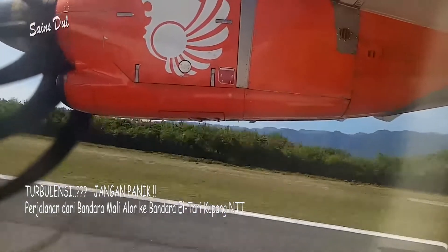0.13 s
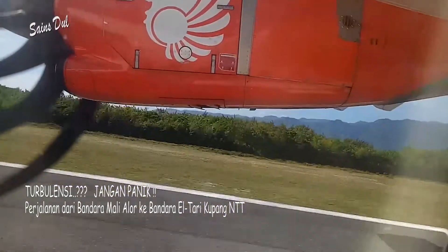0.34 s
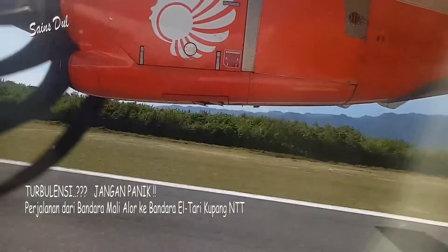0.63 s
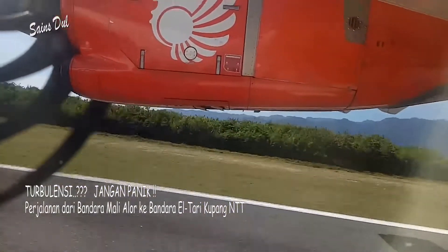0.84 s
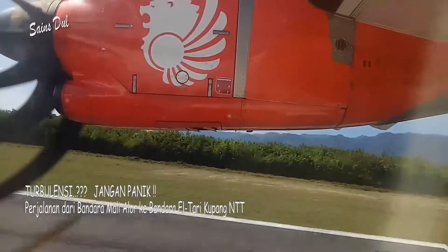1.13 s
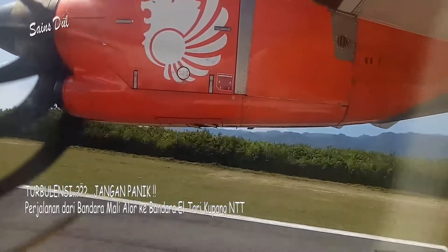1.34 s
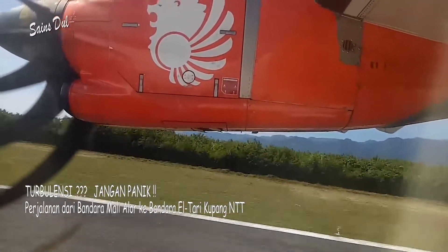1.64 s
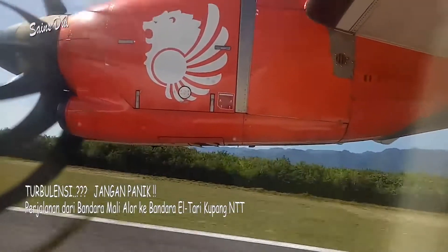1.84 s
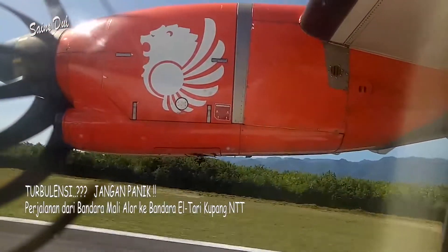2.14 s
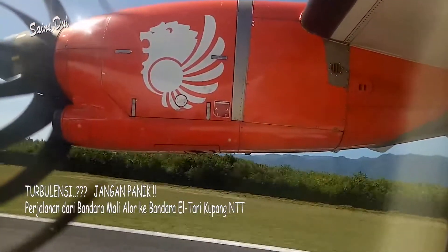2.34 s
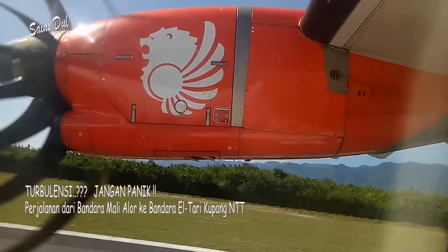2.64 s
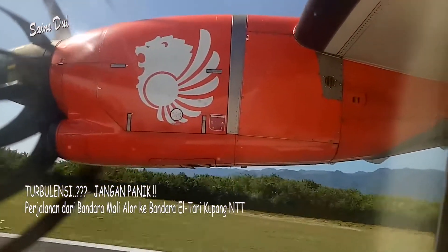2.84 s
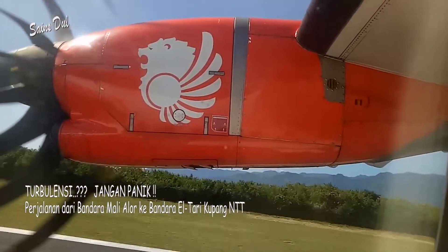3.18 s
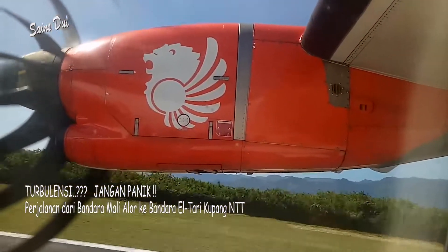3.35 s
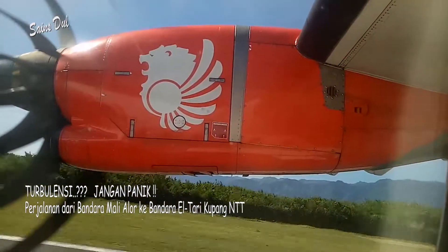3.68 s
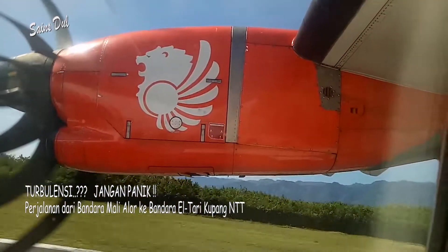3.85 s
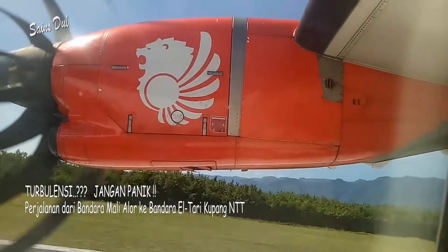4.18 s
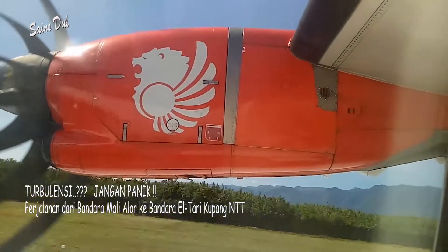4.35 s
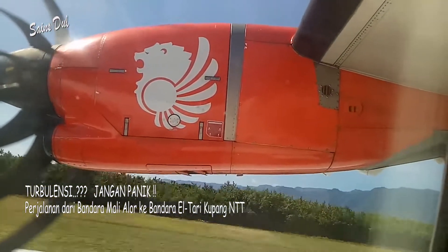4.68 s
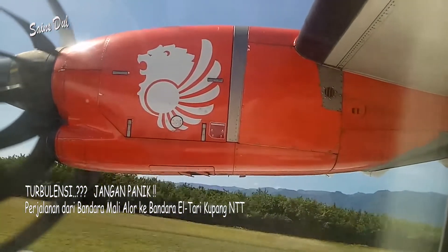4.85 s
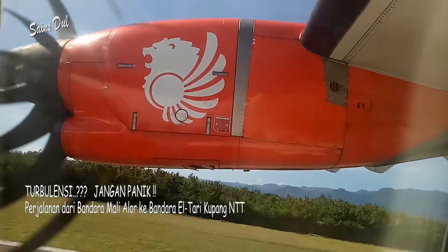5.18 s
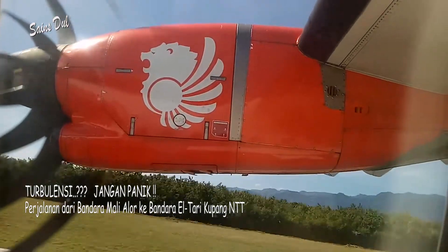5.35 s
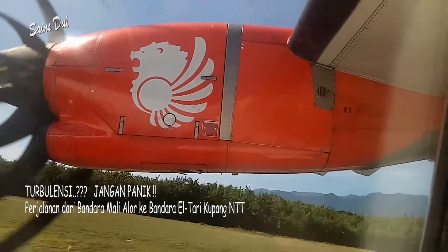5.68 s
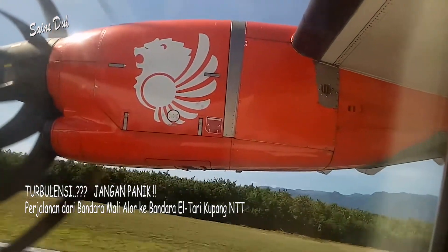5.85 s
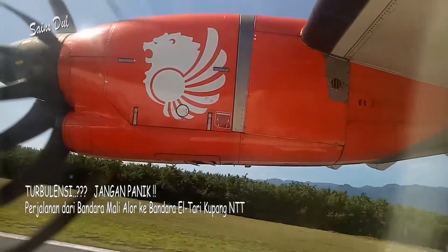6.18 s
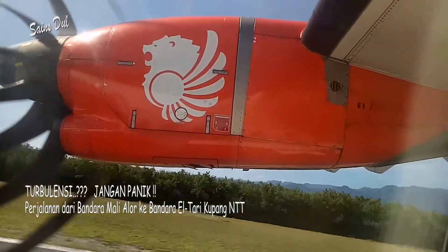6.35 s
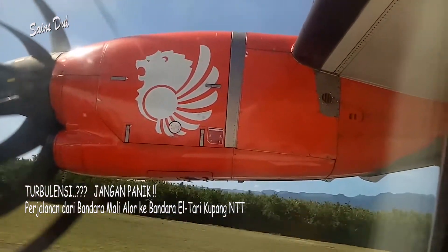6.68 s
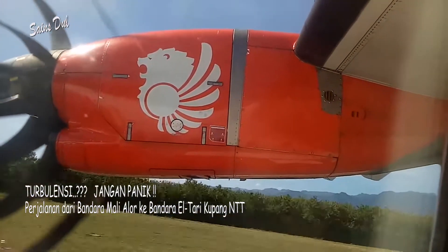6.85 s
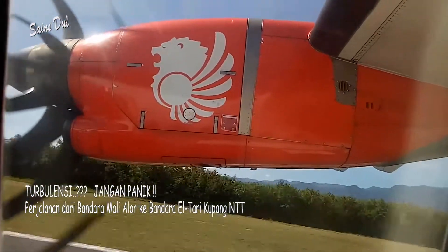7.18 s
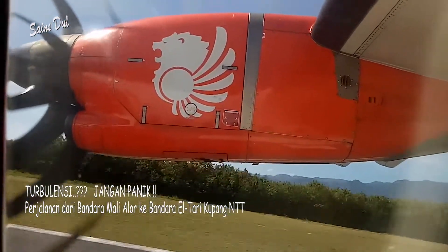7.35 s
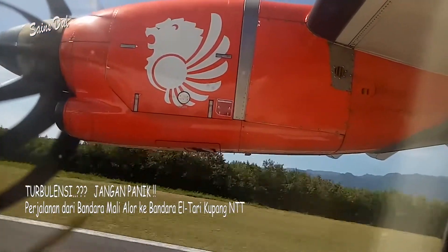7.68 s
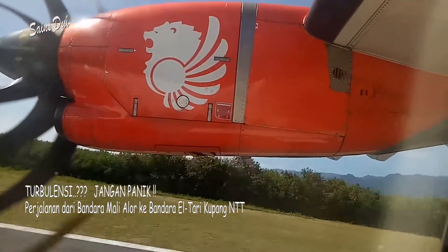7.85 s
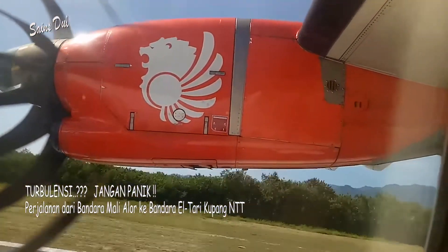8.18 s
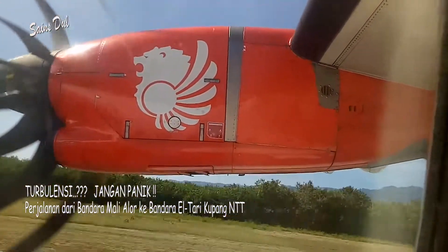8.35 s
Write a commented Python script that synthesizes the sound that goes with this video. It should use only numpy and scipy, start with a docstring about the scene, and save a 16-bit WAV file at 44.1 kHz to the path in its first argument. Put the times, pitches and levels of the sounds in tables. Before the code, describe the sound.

A loud, steady propeller drone and rumble inside an aircraft cabin on its takeoff roll, with buzzing panels and light metallic tinkling.

```python
"""A six-bladed propeller drones through the cabin wall of a turboprop on its take-off roll.
Heard from a seat, on a phone's two microphones held near the window. Each passing blade sends in
a pressure pulse, over airframe rumble and air roar. Close by, trim panels buzz in step with the
blades and chirp, a loose metal fitting tinkles and the seat frame knocks. The left microphone
is the louder one, and a limiter holds down its crests."""
import sys
import numpy as np
from scipy import signal
from scipy.fft import rfft, irfft, next_fast_len
from scipy.io import wavfile
from scipy.ndimage import uniform_filter1d, minimum_filter1d

SR = 44100
rng = np.random.default_rng(int(sys.argv[2]) if len(sys.argv) > 2 else 0)


def bounce(signal):
    """Save signal as a 16-bit WAV file at the path given by the first command-line argument."""
    frames = np.transpose(np.atleast_2d(signal))
    limited = np.clip(frames, -1, 1)
    pcm = np.round(limited * 32767).astype(np.int16)
    wavfile.write(sys.argv[1], SR, pcm)


N = 375732
T = np.arange(N) / SR


def undb(db):
    """Decibels to gain."""
    return 10 ** (np.asarray(db) / 20)


def unit(x):
    """Scale to rms 1."""
    return x / np.sqrt(np.mean(x ** 2))


def curves(table):
    """Columns of a time table, one value a sample."""
    time_s, *columns = np.transpose(table)
    return [np.interp(T, time_s, column) for column in columns]


def wander(rate_hz):
    """Smooth random drift of rms 1, with rate_hz new values a second."""
    hold = int(SR / rate_hz)
    steps = np.repeat(rng.standard_normal(N // hold + 1), hold)
    return unit(uniform_filter1d(uniform_filter1d(steps, hold), hold)[:N])


def ring(x, hz, width_hz):
    """Resonance with gain 1 at its centre."""
    return signal.lfilter(*signal.iirpeak(hz, hz / width_hz, fs=SR), x)


def decay(impulses, tau_s):
    """Give each impulse an exponential tail."""
    return signal.lfilter([1], [1, -np.exp(-1 / (tau_s * SR))], impulses)


def mic_noise(shared=.86, lead_s=.0003):
    """Noise that the right microphone partly shares with the left and hears a little earlier."""
    left, own = rng.standard_normal((2, N))
    right = shared * np.roll(left, -int(lead_s * SR)) + np.sqrt(1 - shared ** 2) * own
    return np.array([left, right])


def shaped_noise(spectrum, swell_db, flicker_db):
    """Stereo noise in half-octave bands that swell together and flicker alone."""
    size = next_fast_len(N)
    freqs = np.maximum(np.arange(size // 2 + 1) * SR / size, 1)
    hz, *columns = np.transpose(spectrum)
    left_db, right_db, shared = (np.interp(np.log(freqs), np.log(hz), c) for c in columns)
    left, own = rfft(rng.standard_normal((2, size)))
    right = shared * left + np.sqrt(1 - shared ** 2) * own
    both = np.array([left * undb(left_db), right * undb(right_db)]) * np.sqrt(SR / 2)
    half_octaves = 2 * np.log2(freqs / hz[0])
    swell, out = wander(9), 0
    for k in range(int(2 * np.log2(hz[-1] / hz[0])) + 1):
        band = irfft(both * np.clip(1 - abs(half_octaves - k), 0, 1), size)[:, :N]
        out += band * undb(swell_db * swell + flicker_db * wander(14))
    return out


# Shaking of the whole cabin over the runway: time_s, level_db
CABIN_SHAKE = [(0.06, -41), (0.08, -39.5), (0.32, -40.5), (0.36, -39), (0.83, -40.5), (0.99, -39),
               (1.3, -39), (1.32, -39.5), (1.7, -39), (1.77, -37.5), (2.23, -39), (2.26, -42), (2.3, -37),
               (2.38, -41.5), (2.42, -39.5), (2.7, -38), (3.1, -40.5), (3.33, -39), (4.01, -40.5),
               (4.03, -37), (4.11, -41.5), (4.13, -33), (4.15, -43.5), (4.18, -38), (4.25, -41),
               (4.41, -38.5), (4.58, -39), (4.64, -39.5), (4.67, -40), (4.97, -40.5), (5.07, -41.5),
               (5.16, -39.5), (5.49, -38), (5.67, -38.5), (5.75, -42), (5.98, -39.5), (6.28, -40.5),
               (6.35, -37), (6.38, -42), (6.42, -40.5), (6.49, -36.5), (6.54, -38.5), (6.84, -39),
               (6.87, -36), (6.89, -39.5), (7.55, -39), (7.62, -36.5), (7.76, -38.5), (7.78, -43),
               (7.82, -37), (7.9, -40.5), (7.94, -34), (7.99, -38.5), (8.01, -33.5), (8.04, -37.5),
               (8.06, -34), (8.11, -40), (8.13, -44), (8.15, -34.5), (8.22, -42.5), (8.25, -36.5),
               (8.27, -40.5), (8.37, -37.5), (8.41, -43), (8.44, -34), (8.46, -37.5)]
def runway_shake():
    """The cabin's shaking in dB about its mean, with quick jolts from the joints."""
    level_db = curves(CABIN_SHAKE)[0]
    return .94 * (level_db - level_db.mean()) + wander(48)


# Window recess and seat gap around the phone: centre_hz, width_hz, left_db, right_db
RECESS_RESONANCES = [(806, 67, -1.5, -2.5), (999, 59, 3.5, 2), (1500, 38, 1, -2), (1780, 65, -6, -1),
                     (2040, 87, -6.5, -6), (2170, 100, 0.5, 1.5), (2380, 47, 4, -1), (2420, 100, -2, -3),
                     (2570, 100, 0.5, 1), (2980, 120, -3, 0.5), (3300, 100, 0.5, -5), (3330, 74, 0.5, 1.5),
                     (3570, 90, -0.5, -3), (4240, 230, 1, 3.5), (4610, 74, 4.5, 1), (4700, 160, -5, -3),
                     (4965, 60, 2, -2), (5200, 100, -3.5, -0.5), (5500, 140, 0.5, -3.5)]
def window_recess(sound):
    """The hollows beside the microphones lay steady peaks and dips on the sound."""
    size = next_fast_len(N)
    freqs = np.arange(size // 2 + 1) * SR / size
    gain_db = sum(np.array([[left_db], [right_db]]) / (1 + (2 * (freqs - hz) / width_hz) ** 2)
                  for hz, width_hz, left_db, right_db in RECESS_RESONANCES)
    return irfft(rfft(sound, size) * undb(gain_db), size)[:, :N]


# Outside air, heard from just inside the wall: freq_hz, left_db, right_db, correlation
ROAR_SPECTRUM = [(400, -74, -79, 0.6), (603, -64, -68, 0.4), (1013, -68, -70.5, 0), (1160, -74, -75.5, 0),
                 (1990, -73, -75.5, 0.19), (2500, -75.5, -81, 0.3), (3000, -76, -82, 0.3),
                 (4770, -73.5, -91, 0.3), (5300, -77, -92.5, 0.05), (5700, -85.5, -97.5, 0.01),
                 (6980, -90.5, -101, 0.02), (8160, -105, -110, 0), (9800, -106, -111, 0),
                 (15000, -115, -121, .5)]
def air_roar(blade_cycles, shake_db):
    """Air roars through the wall; each blade squeezes the leaks, so it throbs with the tone."""
    throb_db = 1.1 * np.cos(2 * np.pi * (blade_cycles - .45)) + .9 * np.cos(4 * np.pi * blade_cycles)
    return shaped_noise(ROAR_SPECTRUM, swell_db=.2, flicker_db=.7) * undb(.9 * shake_db + throb_db)


# The airframe all around the seat: freq_hz, left_db, right_db, correlation
RUMBLE_SPECTRUM = [(8.47, -62, -68, 0.95), (25, -52, -59, 0.97), (41.7, -63, -70.5, .98),
                   (55, -43.5, -51, 1), (90, -40, -50.5, 1), (134.6, -32, -39, 0.98),
                   (164, -41, -48.5, .96), (201, -44.5, -55.5, 1), (235, -43.5, -50.5, 0.9),
                   (288, -47.5, -54.5, .83), (336, -47.5, -54, 0.9), (386, -54, -59, .76),
                   (411, -51.5, -57, .72), (554, -61, -65.5, 0.4), (715, -72.5, -75.5, 0.5)]
def airframe_rumble(level_db):
    """The airframe rumbles in uneven swells, its lows nearly in phase at both microphones."""
    rumble = shaped_noise(RUMBLE_SPECTRUM, swell_db=.73, flicker_db=.7)
    return rumble * undb(.41 * (level_db - level_db.mean()))


def cabin_boom(level_db, pitch_hz=72.1, drift_hz=3.5):
    """A cabin mode booms on runway bumps, its pitch wandering."""
    cycles = np.cumsum(pitch_hz + drift_hz * wander(9)) / SR
    return np.sqrt(2) * np.sin(2 * np.pi * cycles) * undb(level_db - 1 + 1.7 * wander(13))


# Underfoot, the shaft's tone and a second hum above it: pitch_hz, level_db
SHAFT_TONES = [(20.05, 0), (30.1, -1)]
def shaft_thrum(level_db):
    """The shaft turns once in six blade passes and shakes the floor."""
    hum = sum(undb(db) * np.sin(2 * np.pi * (hz * T + rng.random())) for hz, db in SHAFT_TONES)
    return np.sqrt(2) * hum * undb(level_db)


# Knocks in the seat, close to the phone: start_s, level_db
SEAT_KNOCKS = [(0.665, -30), (0.974, -31), (1.766, -28), (1.902, -26.5), (1.952, -30), (2.443, -33),
               (2.548, -32), (2.583, -31), (2.686, -33), (2.974, -27.5), (4.167, -32.5), (4.215, -35),
               (4.34, -35), (4.602, -29), (5.017, -35), (5.233, -29), (6.501, -23.5), (6.861, -35),
               (7.594, -24), (7.901, -22), (7.943, -37), (7.992, -29), (8.425, -22)]
def seat_frame():
    """Each knock through the frame is a short broad burst, dulled by the upholstery."""
    blows = np.zeros(N)
    for start_s, level_db in SEAT_KNOCKS:
        blows[int(start_s * SR)] = undb(level_db + 2)
    burst = decay(blows, tau_s=.0032) * mic_noise()
    body = ring(burst, 1100, 1200)
    edge = ring(ring(burst, 2800, 2500), 2800, 3000)
    return (body + .6 * edge) * undb([[4.5], [-1.5]])


def strikes(events):
    """Short rough rings with a soft rise, a weaker close neighbour and a dry tick; +pan is left."""
    out, t = np.zeros((2, N + SR)), np.arange(SR // 5) / SR
    for start_s, level_db, hz, pan_db, ring_s in events:
        envelope = (1 - np.exp(-t / .0015)) * np.exp(-np.log(1000) * t / ring_s)
        tone = np.sin(2 * np.pi * hz * t) + .5 * np.sin(2 * np.pi * (1.03 * hz * t + rng.random()))
        tick = 2.2 * ring(ring(rng.standard_normal(len(t)), hz, .11 * hz), hz, .11 * hz)
        mic_gains = undb([[level_db + 7], [level_db + 5.5 - pan_db]])
        start = int(start_s * SR)
        out[:, start:start + len(t)] += mic_gains * envelope * (tone + tick)
    return out[:, :N]


# Trim on either side of the phone: start_s, level_db, pitch_hz, pan_db, ring_s
TRIM_CHIRPS = [(2.302, -43, 1490, 1, 0.034), (6.112, -44.5, 1630, -5.5, 0.075),
               (6.195, -49, 1640, -10, 0.11), (6.72, -40.5, 1700, 7, .06)]
def trim_chirps():
    """The trim gives a few short chirps, pitched well below the fitting."""
    return strikes(TRIM_CHIRPS)


# A loose fitting, mostly in the left microphone: start_s, level_db, pitch_hz, pan_db, ring_s
FITTING_TINKLES = [(0.641, -46, 6115, 19, 0.04), (0.917, -43, 6201, 29, 0.04), (0.985, -48, 5254, 13, 0.04),
                   (1.026, -35, 5200, 19, 0.04), (1.068, -37.5, 5200, 28, 0.049),
                   (1.249, -36.5, 5254, 14, 0.04), (1.741, -41, 6140, 16, 0.035),
                   (1.992, -34, 5260, 10, 0.04), (2.168, -45, 6632, 15, 0.04), (2.22, -44, 6115, 25, 0.04),
                   (2.222, -49, 6718, 32, 0.04), (2.225, -31, 4350, 15, 0.04), (2.284, -40, 5200, 8, 0.04),
                   (2.332, -34, 5270, 13, 0.04), (2.396, -31.5, 5220, 13, 0.04),
                   (2.467, -42, 5340, 11, 0.04), (2.508, -42, 5340, 16, 0.036),
                   (2.567, -43, 5254, 11, 0.04), (2.632, -38, 5340, 18, 0.04), (2.686, -49, 5060, -8, 0.04),
                   (2.753, -34, 5220, 7, 0.04), (2.817, -59, 6804, 4, 0.04), (2.817, -32, 5220, 12, 0.04),
                   (2.868, -42.5, 5100, 6, 0.04), (2.933, -48, 5167, 3, 0.04), (3.4, -32, 5340, 16, 0.04),
                   (3.457, -48, 6150, 14, 0.04), (3.461, -30.5, 4350, 14, 0.036),
                   (3.467, -39, 5220, 16, 0.04), (3.525, -32, 5200, 11, 0.03),
                   (3.584, -34.5, 5100, 13, 0.04), (3.75, -39, 5200, 15, 0.04),
                   (3.966, -34, 5254, 19, 0.04), (4.02, -44, 6201, 18, 0.04), (4.023, -36, 5400, 14, 0.04),
                   (4.291, -48, 6300, 22.5, 0.04), (4.448, -44, 5900, 9, 0.04), (4.586, -41, 5330, 6, 0.04),
                   (4.708, -38, 5340, 23, 0.044), (4.866, -41, 5300, 14.5, 0.036),
                   (5.221, -42, 5400, 13, 0.04), (5.557, -52, 5050, -5, 0.04), (5.612, -36, 4000, 7, 0.04),
                   (5.674, -43, 5254, 11, 0.04), (5.834, -38, 4870, 14, 0.04), (5.896, -37, 4909, 18, 0.04),
                   (6.477, -40, 4800, 16, 0.04), (6.753, -41, 5081, 7, 0.04), (6.811, -37, 5167, 9, 0.04),
                   (6.869, -38, 4995, 15, 0.04), (6.946, -52, 6804, 6, 0.04), (7.583, -49, 6718, 21, 0.04),
                   (7.726, -50, 6459, 16, 0.04), (7.726, -47, 5943, 18, 0.04), (7.734, -39, 5280, 8, 0.04),
                   (7.919, -49, 6373, 12, 0.04), (7.927, -33.5, 4909, 17, 0.04),
                   (8.072, -48, 6373, 22, 0.04), (8.131, -39, 5340, 12, 0.04), (8.417, -46, 5167, 1, 0.04)]
def loose_fitting(faint_count=90):
    """The metal rings at each touch, with many weaker touches scattered in time and pitch."""
    when, force, pitch, side = rng.random((faint_count, 4)).T
    faint = zip(when * N / SR, -53 + 7 * force, 4900 + 1700 * pitch ** 3, 6 + 12 * side,
                np.full(faint_count, .03))
    return strikes(FITTING_TINKLES) + strikes(faint)


# Nearby panels, louder on the left, with slaps timed in blade cycles:
# pitch_hz, width_hz, first_slap_cycles, gap_cycles, second_slap_db, left_db, right_db
TRIM_PANELS = [(920, 330, -.12, 0.23, -4, -3.5, -6), (2447, 450, .12, .33, -4, 3, -11.5),
               (3606, 800, -0.12, 0.75, -1, 3.5, -9), (4615, 500, -.48, .58, -4, 4.5, -20.5)]
# How hard each one buzzes: time_s, panel_1_db, panel_2_db, panel_3_db, panel_4_db
BUZZ_LEVELS = [(0.06, -40, -51, -52, -48), (0.1, -46, -49.5, -53.5, -53.5), (0.76, -41.5, -57.5, -50, -50),
               (1.16, -38, -41, -41, -44.5), (1.44, -44, -50, -56, -48.5), (2.14, -46.5, -41.5, -50, -45),
               (2.4, -42, -48.5, -54, -47.5), (2.45, -37, -44, -55, -45), (3.96, -50, -48, -55, -46),
               (4.08, -42, -49, -44, -40.5), (4.27, -46.5, -54, -47, -54), (4.34, -36, -51, -44, -51),
               (4.76, -48.5, -51.5, -48.5, -48), (5.44, -50, -49.5, -46, -44), (6.54, -40.5, -52, -43, -48),
               (7.01, -42, -42.5, -43.5, -43), (7.22, -46, -50, -48, -45), (7.99, -43.5, -52, -42.5, -51),
               (8.39, -49.5, -44.5, -45, -47), (8.46, -35, -42, -47.5, -52)]
def panel_buzz(blade_cycles, shake_db, jitter_s=.0003):
    """Each panel slaps its frame twice a blade, harder on some blades and in uneven spells."""
    out = 0
    for panel, level_db in zip(TRIM_PANELS, curves(BUZZ_LEVELS)):
        hz, width_hz, first, gap, second_db, left_db, right_db = panel
        slaps = np.zeros(N)
        for lag, slap_db in ((first, 0), (first + gap, second_db)):
            due = np.flatnonzero(np.diff(np.floor(blade_cycles - lag)))
            timing, force = rng.standard_normal((len(due), 2)).T
            landed = np.clip(due + (timing * jitter_s * SR).astype(int), 0, N - 1)
            slaps[landed] += undb(slap_db + 1.5 * force)
        # the out-of-balance shaft leans on the panel once in six blades
        lean_db = 2.2 * np.cos(2 * np.pi * (blade_cycles / 6 + rng.random()))
        slaps *= undb(lean_db + .68 * wander(18))
        scrape = decay(slaps, tau_s=.0009) * mic_noise()
        buzz = ring(ring(scrape + 2.7 * slaps, hz, width_hz), hz, 1.9 * width_hz)
        out += unit(buzz) * undb(level_db + .46 * shake_db) * undb([[left_db], [right_db]])
    return out


# Overtones of the blade tone at the window: harmonic, level_db, lead_cycles, pan_db
BLADE_OVERTONES = [(2, 1, -.18, 7.5), (3, -10.5, -.18, 3), (4, -25.5, -0.02, 3.5)]
def propeller(blade_cycles, tone_db, overtones_db):
    """The pressure of each passing blade: a strong fundamental and locked overtones that flutter."""
    fundamental_db = uniform_filter1d(tone_db, SR // 6) + .4 * wander(6)
    out = np.cos(2 * np.pi * blade_cycles) * undb(fundamental_db) * undb([[3.6], [-3.6]])
    smooth_db = uniform_filter1d(overtones_db, SR // 4)
    for harmonic, level_db, lead, pan_db in BLADE_OVERTONES:
        overtone = np.cos(2 * np.pi * (harmonic * blade_cycles + lead))
        flutter_db = .3 * harmonic * wander(4.8)
        out += overtone * undb(smooth_db + level_db + flutter_db) * undb([[pan_db / 2], [-pan_db / 2]])
    return out * np.sqrt(2)


# The drone at the window seat: time_s, tone_db, boom_db, thrum_db, overtones_db, rumble_db
DRONE_LEVELS = [(0.06, -7, -28, -26, -28, -20), (0.15, -8.5, -35, -31, -30.5, -23),
                (0.24, -9.5, -28, -27.5, -32, -26), (0.32, -7, -27, -25.5, -42, -26.5),
                (0.46, -9.5, -24, -29, -29, -23.5), (0.53, -8.5, -24, -28, -38, -20.5),
                (0.67, -8.5, -43, -30, -27, -27.5), (0.85, -19, -33, -30, -36, -23),
                (0.92, -6.5, -41.5, -29.5, -38, -26.5), (1.06, -9, -33.5, -30.5, -32.5, -20.5),
                (1.23, -8, -29, -25.5, -38.5, -23.5), (1.32, -8, -30, -27.5, -24.5, -24),
                (1.46, -11, -32, -31, -31, -21.5), (1.67, -8.5, -32, -31, -31, -25.5),
                (1.86, -10.5, -25.5, -30, -28, -19), (1.91, -9, -28, -30, -42, -26),
                (2.05, -8.5, -27, -32, -47.5, -18.5), (2.14, -9.5, -31, -29, -24, -25),
                (2.28, -8, -31, -28, -33.5, -23), (2.38, -9.5, -27, -27.5, -38, -24.5),
                (2.45, -7, -21, -30, -21, -18.5), (2.54, -10, -35, -29, -32.5, -18.5),
                (2.72, -9, -30, -30.5, -31.5, -22), (2.96, -8, -32, -30, -28, -23),
                (3.43, -8.5, -24, -27.5, -33, -23.5), (3.59, -6, -33, -30, -23.5, -23.5),
                (3.69, -7, -45, -29, -34.5, -26), (3.83, -11.5, -29.5, -33.5, -32, -22),
                (3.92, -8, -31, -29, -29.5, -18), (3.99, -9, -29.5, -28, -33, -28),
                (4.06, -9, -21, -26, -32, -24.5), (4.25, -10.5, -25.5, -33, -26, -23.5),
                (4.81, -8.5, -23, -29, -30.5, -22.5), (4.9, -8, -36.5, -31, -22, -23.5),
                (4.97, -12.5, -15, -31, -28.5, -20), (5.09, -11.5, -29, -35, -28, -23),
                (5.23, -13, -18.5, -29, -35.5, -23.5), (5.42, -8.5, -22, -29, -29, -23),
                (5.56, -10.5, -27, -30, -31.5, -16), (5.75, -8.5, -18, -30, -31.5, -26),
                (5.84, -9.5, -23.5, -34, -36, -22), (5.95, -10.5, -14, -30, -30, -24.5),
                (6.07, -12.5, -30, -29, -31.5, -24), (6.24, -10, -21.5, -35, -30, -21),
                (6.4, -9.5, -31, -27, -27, -19.5), (6.56, -6.5, -20, -30, -32, -15.5),
                (6.63, -8.5, -26, -29, -27.5, -24), (6.7, -13, -21, -36.5, -29, -18.5),
                (6.77, -13, -20.5, -41, -32, -19.5), (6.91, -10.5, -23, -31, -37, -19.5),
                (7.1, -11, -37, -32, -34, -22), (7.19, -7.5, -23, -35, -27, -19.5),
                (7.31, -14.5, -22.5, -32.5, -24, -22), (7.4, -9.5, -29, -30, -31.5, -19),
                (7.59, -13, -21.5, -30, -32, -20.5), (7.69, -11, -31, -42, -29, -21),
                (7.78, -14, -20, -33, -35.5, -24), (8.04, -8.5, -25, -30, -31, -22),
                (8.08, -10.5, -24, -29, -41, -22.5), (8.13, -7, -31, -32, -44, -20.5),
                (8.3, -11.5, -23, -32, -25.5, -21.5), (8.46, -5.5, -13, -31, -30.5, -20.5)]
def drone(blade_cycles):
    """The propeller comes through the wall on top of the rumble, boom and thrum."""
    tone_db, boom_db, thrum_db, overtones_db, rumble_db = curves(DRONE_LEVELS)
    low_end = (cabin_boom(boom_db) + shaft_thrum(thrum_db)) * undb([[2.7], [-4]])
    return airframe_rumble(rumble_db) + low_end + propeller(blade_cycles, tone_db, overtones_db)


def scene(blade_hz=120):
    """The cabin as it reaches the two microphones near the window."""
    shake_db = runway_shake()
    # the governor holds the speed; only the phase drifts as the path through the wall shifts
    blade_cycles = blade_hz * T + .06 * wander(1.3) + .008 * wander(7)
    roar = air_roar(blade_cycles, shake_db)
    # plastic and padding give off little above the panels' own rings
    padding = signal.butter(3, 5600, fs=SR, output="sos")
    rattles = signal.sosfilt(padding, seat_frame() + panel_buzz(blade_cycles, shake_db))
    return window_recess(roar + rattles) + trim_chirps() + loose_fitting() + drone(blade_cycles)


def record(dry, ceiling=1.018, clip_level=.997, look_ahead_s=.002, top_hz=15500):
    """The phone limits each channel so the highest crests just clip, then cuts the top."""
    look = int(look_ahead_s * SR)
    gain = minimum_filter1d(ceiling / np.maximum(abs(dry), ceiling), 2 * look + 1, axis=1)
    gain = uniform_filter1d(uniform_filter1d(gain, look, axis=1), look, axis=1)
    limited = np.clip(dry * gain, -clip_level, clip_level)
    return signal.sosfiltfilt(signal.ellip(6, .005, 40, top_hz, fs=SR, output="sos"), limited)


dry = scene()
out = record(dry)
bounce(out)
```